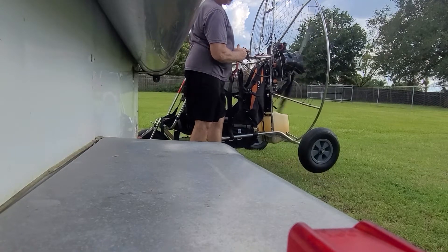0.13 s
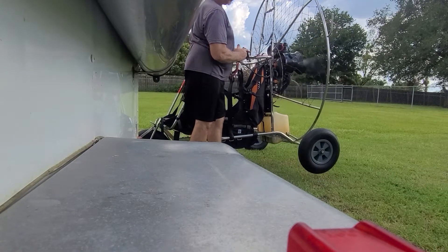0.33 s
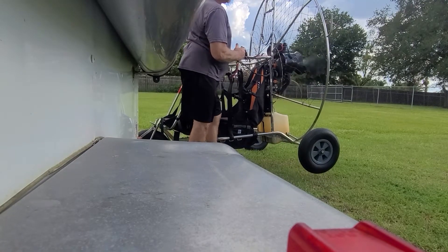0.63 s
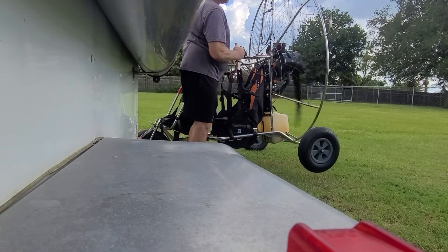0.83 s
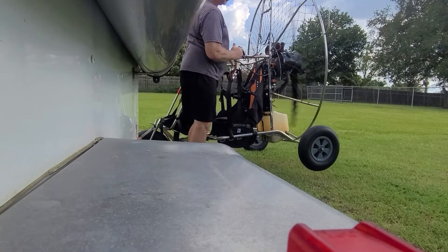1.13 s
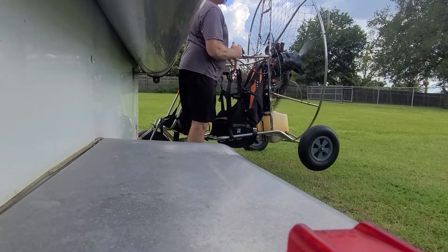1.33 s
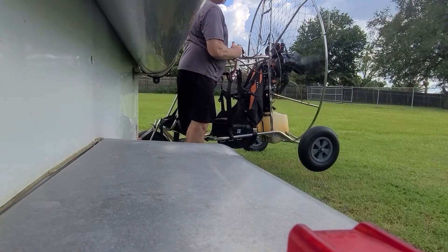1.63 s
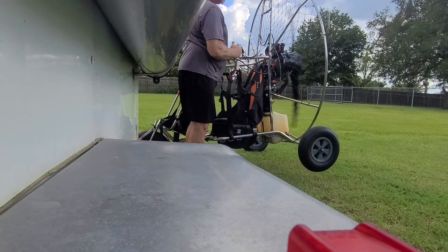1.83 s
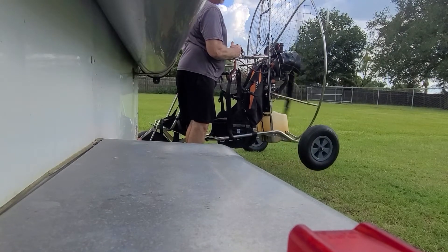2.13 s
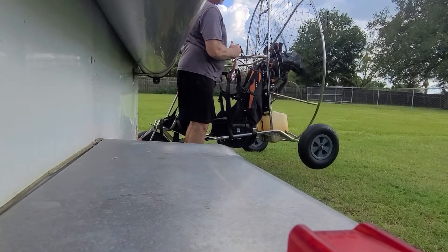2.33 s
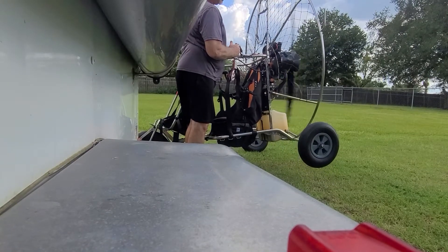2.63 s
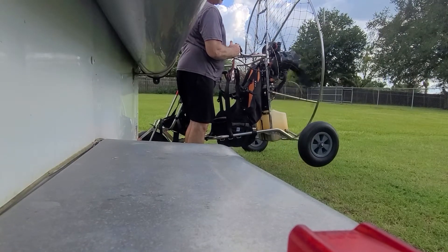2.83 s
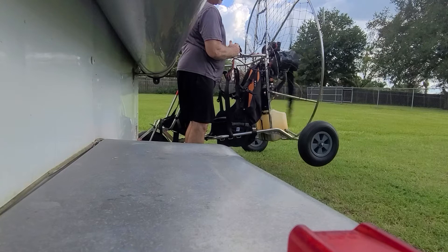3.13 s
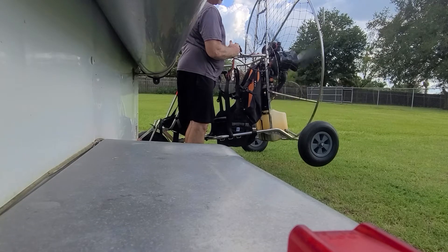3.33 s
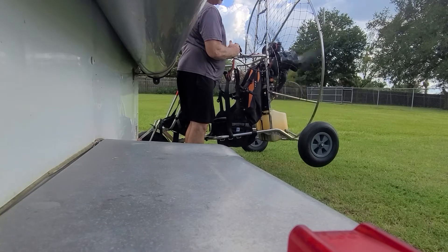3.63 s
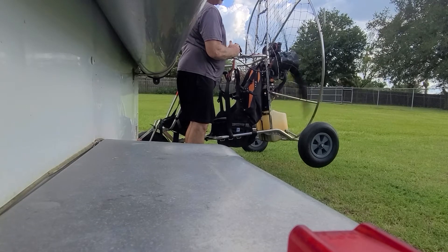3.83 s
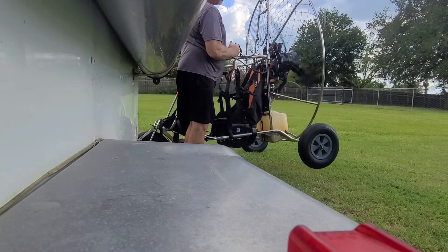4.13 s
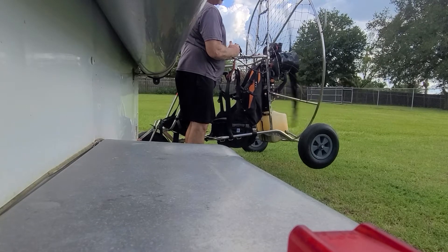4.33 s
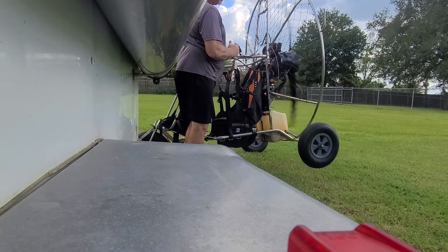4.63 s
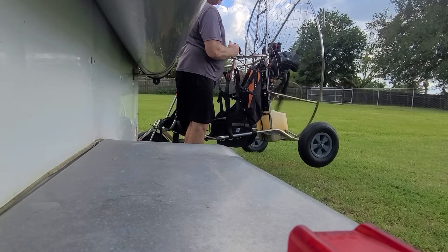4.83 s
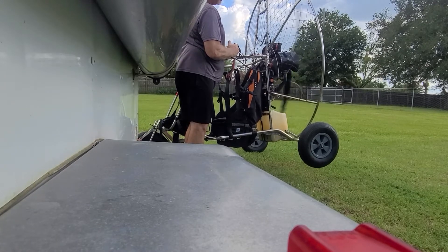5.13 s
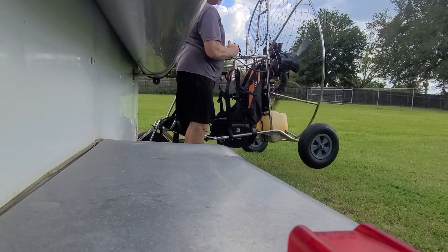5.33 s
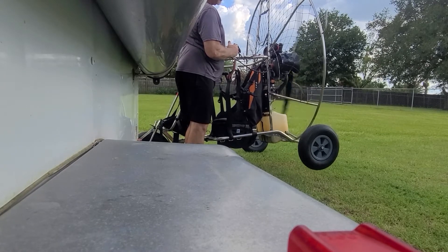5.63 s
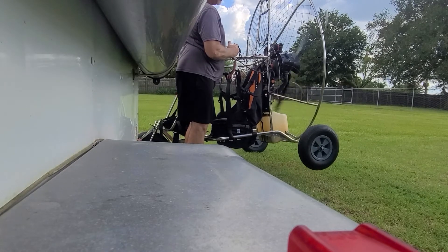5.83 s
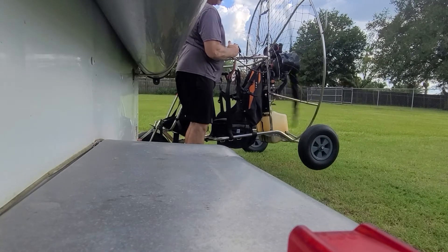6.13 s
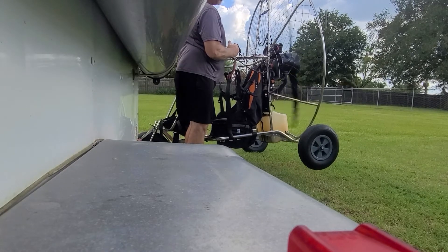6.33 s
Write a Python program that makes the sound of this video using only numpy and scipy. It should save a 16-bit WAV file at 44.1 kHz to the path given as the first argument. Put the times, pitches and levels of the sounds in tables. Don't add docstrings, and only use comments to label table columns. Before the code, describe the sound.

A small two-stroke engine drives a three-bladed propeller at steady high power, a few metres away on open grass beside a metal trailer. A dense low buzz near 127 hertz and a strong nasal tone near 635 hertz slowly beat together. Bright hiss, fast casing rattle and rumbling prop wash surround it. The close stereo microphone hears it constantly, with no start or stop.

```python
import sys
import numpy as np
from scipy import signal
from scipy.fft import rfft, irfft
from scipy.io import wavfile
from scipy.ndimage import uniform_filter1d

SR = 44100
rng = np.random.default_rng(int(sys.argv[2]) if len(sys.argv) > 2 else 0)


def wav_out(sig):
    wavfile.write(sys.argv[1], SR, np.round(np.clip(np.atleast_2d(sig).T, -1, 1) * 32767).astype(np.int16))


def gain_from_db(level_db):
    decades = np.asarray(level_db, float) / 20
    return 10 ** decades


N = 285327
HZ = np.fft.rfftfreq(N, 1 / SR)

# (time [s], firing rate [Hz])
ENGINE_SPEED = [(0, 126.5), (.5, 126.92), (.83, 127.38), (1.0, 127.2), (1.35, 127.64), (1.98, 127.52),
                (2.16, 128.02), (2.31, 127.93), (2.52, 128.56), (2.85, 128.63), (3.3, 128.05),
                (3.8, 126.62), (4.15, 126.72), (4.53, 127.24), (5.3, 126.45), (5.97, 126.18), (6.16, 125.5),
                (6.47, 125.1)]
# (frequency [Hz], phase [rad])
PORT_LEAD = [(0, 0), (635, .48), (760, 1.1), (890, 1.3), (1015, 0), (1140, 2.1), (1270, -.5), (1400, -.4),
             (1780, .7), (2410, 4.4), (16000, 29.6)]


def set_level(x, db):
    return x * gain_from_db(db) / np.sqrt(np.mean(x ** 2))


def curve(rows):
    return np.interp(np.arange(N) / SR, *np.transpose(rows))


def across(rows):
    at_hz, *columns = np.transpose(rows)
    return np.array([np.interp(np.log(HZ + 1), np.log(at_hz + 1), c) for c in columns])


def colour(x, rows):
    closed_db = [-80] * (len(rows[0]) - 1)
    below = (rows[0][0] / 2, *closed_db)
    above = (rows[-1][0] * 2, *closed_db)
    return irfft(rfft(x) * gain_from_db(across([below, *rows, above])), N)


def walk(rate):
    hold = int(SR / rate)
    held = np.repeat(rng.standard_normal(N // hold + 1), hold)
    slewed = uniform_filter1d(uniform_filter1d(held, hold), hold)[:N]
    return slewed / np.std(slewed)


def ports(spectra):
    # (frequency [Hz], shared power [0-1])
    port_coherence = [(30, .6), (130, .93), (640, .75), (1400, .45), (3000, .35), (8000, .4), (15000, .3)]
    share = np.clip(across(port_coherence), 0, 1)
    half_lead = np.interp(HZ, *np.transpose(PORT_LEAD)) * np.array([[.5], [-.5]])
    shared = np.sqrt(share) * np.exp(1j * half_lead) * spectra[0]
    separate = np.sqrt(1 - share) * spectra[1:]
    return irfft(shared + separate, N)


def pulse_phase(k, skew, lag, lowest, above_pipe):
    pipe = 5.5
    return skew + lag * k + lowest * (k == 1) + above_pipe * (pipe < k < 2 * pipe - .5)


def tones(rows, firing, blade, wander_db, slow, quick):
    speed_tilt = {(0, 1): -.03 - .08j, (2, 0): .28 - .05j, (0, 2): -.08 + .23j, (3, 0): -.02 + .6j, (2, 1): .5 - .25j, (0, 3): .13 + .38j, (4, 0): .23 + .2j, (0, 4): .25 + .55j, (5, 0): -.07, (6, 0): .12 + .06j, (7, 0): .3j, (8, 0): .4, (6, 2): .5, (9, 0): -.2 + .3j, (10, 0): -.1 + .3j, (11, 0): .22 + .24j}
    out = np.zeros((2, N))
    speed = curve(ENGINE_SPEED)
    faster_hz = speed - np.mean(speed)
    for e, b, *db in rows:
        angle = e * firing + b * blade
        if e > 0:
            angle = angle + pulse_phase(e, skew=2.4, lag=-.5, lowest=-2.2, above_pipe=-.85)
        if b > 0:
            angle = angle + pulse_phase(b, skew=-2.4, lag=1.95, lowest=2.64, above_pipe=0)
        if e > 0 and b == 1:
            angle = angle - .9
        waver = 1 + gain_from_db(wander_db) * np.sqrt(e + b) * (walk(slow) + 1j * walk(slow) + walk(quick))
        tilt = 1 + speed_tilt.get((e, b), 0) * faster_hz
        tone = waver * tilt * np.exp(1j * angle)
        lead = np.interp((e + b) * ENGINE_SPEED[0][1], *np.transpose(PORT_LEAD))
        gains = gain_from_db(np.array(db)) * np.exp([0, -1j * lead])
        out += np.sqrt(2) * np.real(np.outer(gains, tone))
    return out


def wash():
    # (frequency [Hz], level [dB])
    wash_spectrum = [(25, -17), (50, -12.5), (85, -5), (130, -3), (200, -6), (330, -7.5), (450, -4.5),
                     (720, 3), (900, -10.5), (1050, -5), (1250, -4.5), (1500, -9.5), (1900, -19),
                     (2200, -24)]
    gusts = gain_from_db(.7 * walk(25))
    return colour(ports(rfft(rng.standard_normal((3, N)) * gusts)), wash_spectrum)


def hiss(firing, blade, puff, tips, flicker_db):
    # (frequency [Hz], left level [dB], right level [dB])
    hiss_spectrum = [(1730, -38.5, -4), (2300, -12.5, -18), (3140, -14, -42), (4100, -8.5, -15),
                     (5130, -9, -26), (6400, -7.5, -35), (6870, -16.5, -18.5), (8190, -1.5, -19),
                     (8600, -2.5, -4), (10200, -4.5, -16), (11700, -5, -1.5), (11940, 3, -12),
                     (15000, -3, -11.5), (16160, -10, -2.5)]
    gate = 1 + puff * np.cos(firing - .3) + tips * np.cos(blade)
    spectra, gust = 0, walk(70)
    for centre_hz in 1000 * 2 ** np.arange(0, 4.1, .5):
        octaves_off = abs(np.log2((HZ + 1) / centre_hz))
        band = np.clip(1 - 2 * octaves_off, 0, 1) ** .5
        noise = irfft(band * rfft(rng.standard_normal((3, N))), N)
        flicker = gain_from_db(flicker_db * (walk(25) + 1.26 * gust))
        spectra = spectra + rfft(noise * gate * flicker)
    return colour(ports(spectra), hiss_spectrum)


def rattle(firing, ring_s, steady, drift, scatter_db):
    # (frequency [Hz], left level [dB], right level [dB])
    casing_spectrum = [(990, 7, -2), (1540, -3, -15), (1860, -1.5, 2), (2160, -6.5, -17),
                       (2750, -12, -18.5), (3060, -17, -24.5), (4020, -11, -11), (4075, -0.5, 0.5),
                       (4380, -6.5, -20.5), (4660, -1, -10), (4900, -7, -12), (6700, -5, -16),
                       (7000, -15, -37), (9900, -16, -22)]
    turns = firing / (2 * np.pi)
    at = np.flatnonzero(np.diff(np.floor(turns)))
    late = (turns[at + 1] % 1) / (turns[at + 1] - turns[at])
    size = gain_from_db(scatter_db * rng.standard_normal(len(at)))
    knocks = np.zeros(N)
    for tap in range(-8, 9):
        window = np.cos(np.pi * (tap + late) / 18) ** 2
        knocks[np.clip(at + 1 + tap, 0, N - 1)] += size * np.sinc(tap + late) * window
    fade = np.exp(-np.arange(2048) / (ring_s * SR))
    grips = np.array([np.full(N, steady)] + [walk(drift) for _ in range(5)])
    grips /= np.sqrt(np.sum(grips ** 2, axis=0))
    spectra = 0
    for grip in grips:
        ring = rfft(fade * rng.standard_normal((3, len(fade))), N)
        spectra = spectra + rfft(grip * knocks) * ring / np.abs(ring) ** .7
    return colour(ports(spectra), casing_spectrum)


def shaft(crank, blade):
    rows = [(0, k / 3, -58, -58) for k in (2, 4, 5, 8, 10, 11, 14, 16)]
    return tones(rows, crank, blade, wander_db=-12, slow=4, quick=12)


def propeller(crank, blade):
    # (multiple of the blade rate, left level [dB], right level [dB])
    blade_harmonics = [(1, -22.2, -21.5), (2, -22.1, -21.8), (3, -30.2, -30.6), (4, -38, -38),
                       (5, -47.8, -42.8), (6, -39, -35.5), (7, -46.7, -43.3), (8, -50.2, -55.5)]
    # (firing multiple, blade multiple, left level [dB], right level [dB])
    chopped_exhaust = [(1, 1, -44, -43), (2, 1, -39, -37), (5, 1, -46, -46), (6, 2, -54, -48),
                       (6, 3, -40, -53), (6, 4, -44, -55), (6, 5, -53, -44)]
    rows = [(0, k, left, right) for k, left, right in blade_harmonics] + chopped_exhaust
    return tones(rows, crank, blade, wander_db=-28, slow=9, quick=20)


def exhaust(crank, blade):
    # (multiple of the firing rate, left level [dB], right level [dB])
    exhaust_harmonics = [(1, -21.0, -20.3), (2, -31.4, -30.0), (3, -40.9, -37.9), (4, -27.6, -28.6),
                         (5, -16.0, -16.1), (6, -23.2, -21.9), (7, -37, -40), (8, -47, -43),
                         (9, -28.5, -35.5), (10, -29.5, -33.1), (11, -39.5, -32.3), (12, -46.5, -46.5),
                         (13, -46.5, -48.5), (14, -45.4, -46.0), (15, -53.0, -53.9), (16, -56.5, -58.3),
                         (17, -68.6, -64.1), (18, -71.8, -79.2), (19, -54.3, -63.1), (20, -56.8, -66.2),
                         (21, -56.7, -65.7), (22, -57.1, -70.9), (23, -52.5, -60.4), (24, -62.9, -67.3)]
    rows = [(k, 0, left, right) for k, left, right in exhaust_harmonics]
    return tones(rows, crank, blade, wander_db=-31, slow=5, quick=25)


def scene():
    speed = curve(ENGINE_SPEED)
    firing = 2 * np.pi * np.cumsum(speed) / SR
    cruise_hz = 127
    slip_hz = .4035 + .0465 * (speed - cruise_hz)
    blade = firing - 2 * np.pi * np.cumsum(slip_hz) / SR
    crank = firing + .005 * walk(60) + .008 * walk(18)
    rumble = set_level(wash(), -31)
    air = set_level(hiss(firing, blade, puff=.17, tips=.02, flicker_db=.45), -27)
    casing = rattle(firing + .004 * walk(25), ring_s=.0035, steady=1.1, drift=4, scatter_db=1.1)
    casing = set_level(casing, -33)
    return rumble + air + casing + shaft(crank, blade) + propeller(crank, blade) + exhaust(crank, blade)


def low_pass(x):
    return signal.sosfilt(signal.butter(12, 15800, fs=SR, output="sos"), x)


def record(dry):
    mix = np.tanh(.5 * dry) / .5
    return low_pass(mix)


dry = scene()
out = record(dry)
wav_out(out)
```